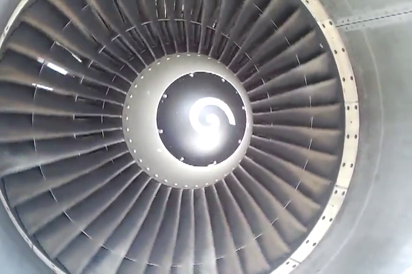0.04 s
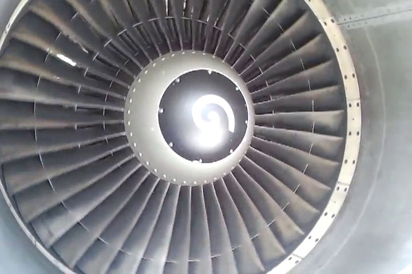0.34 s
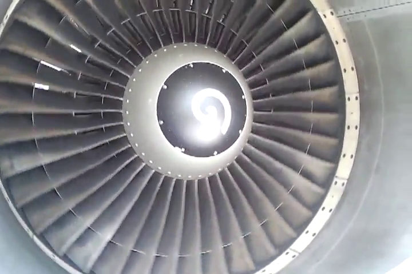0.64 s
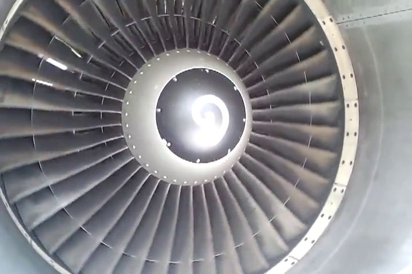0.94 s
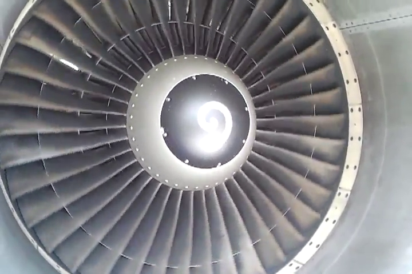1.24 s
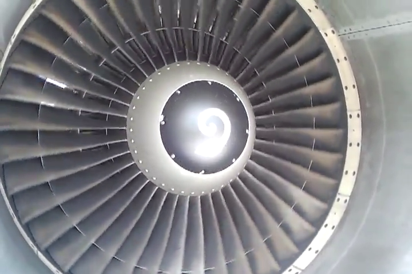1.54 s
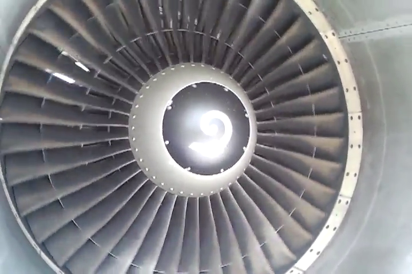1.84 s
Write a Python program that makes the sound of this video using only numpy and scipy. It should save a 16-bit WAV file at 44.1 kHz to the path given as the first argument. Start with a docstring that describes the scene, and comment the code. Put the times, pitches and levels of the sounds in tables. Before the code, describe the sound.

Loose blades of a slowly turning jet engine fan clack throughout, about seven sharp, briefly ringing metallic hits a second, slightly uneven and a little louder from 3 seconds. Two faint, thin squeaks come at about 1.3 and 1.7 seconds. Distant engines roar and whine softly behind. Low wind buffets on the microphone grow from around 2 seconds and are strongest between 3 and 4.

```python
"""Windmilling jet engine fan

The fan of a parked jet engine turns in the breeze. Each loose blade, passing over the top, tips in its
root slot and chatters to rest. The impacts excite the modes of blade, disc and inlet: about seven
metallic clacks a second, with two thin squeaks from the roots. Distant engines drone behind the fan,
and wind buffets the microphone more and more."""
import sys
import numpy as np
from scipy import signal
from scipy.fft import rfft, irfft
from scipy.io import wavfile

SR = 44100
rng = np.random.default_rng(int(sys.argv[2]) if len(sys.argv) > 2 else 0)


def output_pcm(signal):
    """Save a mono or channel-first signal as 16-bit PCM at the path in sys.argv[1].

    Samples are clipped to [-1, 1] before scaling.
    """
    pcm = np.clip(np.atleast_2d(signal).T, -1, 1) * 32767
    wavfile.write(sys.argv[1], SR, np.round(pcm).astype(np.int16))


N = 176400
TIME = np.arange(N) / SR
FREQ_HZ = np.fft.rfftfreq(N, 1 / SR)


def amp(db):
    """Amplitude ratio of a level in decibels."""
    return 10 ** (np.asarray(db) / 20)


def unit_rms(x):
    """Normalisation to an rms of one."""
    return x / np.sqrt(np.mean(x ** 2) + 1e-20)


def unit_energy(x):
    """Normalisation to an energy of one."""
    return x / (np.linalg.norm(x) + 1e-12)


def envelope(points):
    """Amplitude envelope interpolated between (time_s, level_db) points."""
    return amp(np.interp(TIME, *np.transpose(points)))


def spectrum_db(points, hz):
    """Spectral envelope: (frequency_hz, level_db) points interpolated in log frequency."""
    point_hz, db = np.transpose(points)
    return np.interp(np.log(hz + 1), np.log(point_hz), db)


def add(mix, start_s, sound):
    """Superposition of a sound on the mix."""
    part = mix[max(round(start_s * SR), 0):][:len(sound)]
    part += sound[:len(part)]


def noise(gain):
    """Spectral shaping of white noise by a gain at each of FREQ_HZ, to an rms of one."""
    return unit_rms(irfft(rfft(rng.standard_normal(N)) * gain, N))


def narrowband(hz, width_hz):
    """Noise confined to one resonance, heard as a wavering tone."""
    offset = (FREQ_HZ - hz) / width_hz
    return noise(1 / (1 + 2 * offset ** 2))


def drift(rate_hz):
    """Slow random modulation: low-pass noise."""
    return noise(np.exp(-(FREQ_HZ / rate_hz) ** 2))


def colour(x, gain_db, size=4096):
    """Minimum-phase filtering by gain_db, a function of frequency."""
    log_gain = np.log(amp(gain_db(abs(np.fft.fftfreq(size, 1 / SR)))))
    response = np.exp(np.conj(signal.hilbert(log_gain)))
    taps = np.fft.ifft(response).real[:size // 2]
    return signal.fftconvolve(x, taps)[:len(x)]


def fan(main_t60_s=0.086, pivot_hz=3600, size=12000):
    """Impact excitation: each clack is a contact force convolved with the metal's impulse response."""
    # Tips and rebounds of the blades; main_db is the main mode relative to the rest of the ring.
    # start_s, level_db, chatter_s, pitch_hz, main_db, tilt_db_per_octave
    clacks = [(0.05, -30, 0.035, 3700, -7, 0.5), (.139, -13.5, 0.02, 3720, -31, 2),
              (.171, -20.5, .02, 3650, -4, 0.5), (0.243, -17.5, 0.046, 3610, -4, -1),
              (0.365, -16, 0.015, 3460, -8, 0.5), (.499, -15.5, 0.03, 3550, -10, -1.5),
              (0.634, -15.5, 0.042, 3520, -2.5, -3), (0.78, -13, 0.022, 3505, -5, 0),
              (0.952, -31.5, 0.018, 3650, -8, -0.5), (1.036, -16.5, 0.014, 3616, -19, -1.5),
              (1.062, -22.5, 0.026, 3690, -7, -2.5), (1.158, -18, 0.015, 3580, -10, -0.5),
              (1.273, -17, 0.025, 3660, -5.5, -1.5), (1.412, -14, 0.009, 3580, -14.5, 3),
              (1.545, -15.5, 0.03, 3555, -6, -0.5), (1.811, -18.5, 0.058, 3630, 0.5, -1),
              (1.840, -22.5, 0.011, 3590, -2, 10), (1.934, -12.5, 0.031, 3660, -2.5, 1),
              (2.083, -15, 0.024, 3640, -1, -1), (2.213, -18, 0.023, 3710, -28, 0.5),
              (2.483, -22, 0.018, 3550, -19, -1.5), (2.601, -17, 0.049, 3520, -6, -1),
              (2.767, -27.5, 0.024, 3535, -7.5, -2.5), (2.882, -16.5, 0.028, 3590, -17, 0.5),
              (2.99, -13, 0.023, 3490, -11.5, 0.5), (3.133, -13, 0.032, 3633, -8, -0.5),
              (3.262, -11.5, 0.03, 3620, -16, 0.5), (3.400, -13.5, 0.027, 3570, -15, -1),
              (3.537, -13.5, 0.036, 3530, -3.5, -0.5), (3.661, -9, 0.027, 3430, -24, 2),
              (3.782, -13, .025, 3624, -5.5, 1.5), (3.923, -11.5, 0.015, 3650, -10, 2)]
    out, t = np.zeros(N), np.arange(size) / SR
    for start_s, level_db, chatter_s, pitch_hz, main_db, tilt in clacks:
        force = chatter(t, chatter_s)
        main_mode = amp(-60 * t / main_t60_s) * np.sin(2 * np.pi * pitch_hz * t)
        main = signal.fftconvolve(force, main_mode)[:size]
        rest = signal.fftconvolve(force, metal_ring(t))[:size]
        rest = colour(rest, lambda hz: tilt * np.log2(np.maximum(hz / pivot_hz, .5)))
        clack = unit_rms(rest) + amp(main_db) * unit_rms(main)
        onset_rms = clack[:1100].std()  # first 25 ms
        add(out, start_s, amp(level_db) * clack / onset_rms)
    return out


def chatter(t, length_s, median_gap_s=0.001, fade_db=-13.5, spread_db=3):
    """Inelastic rebound: the root strikes its slot, then bounces unevenly with weakening impulses."""
    gap, side, strength = rng.standard_normal((3, 200))
    times = median_gap_s * np.cumsum(np.exp(.7 * gap))
    impulses = np.sign(side) * amp(spread_db * strength + fade_db * (times / length_s) ** 3)
    force = np.bincount((times * SR).astype(int), impulses, len(t))[:len(t)]
    force[0] = 1.43  # firm first contact
    return force


def metal_ring(t, blade_t60_s=0.12, disc_t60_s=.1, tail_t60_s=0.23, blade_db=-11):
    """Modal superposition: distinct blade modes sound over the dense modes of disc and inlet."""
    # Modes common to the blades: frequency_hz, relative_db
    blade_modes = [(1840, -19), (2985, -11), (3272, -4), (4140, -8), (4381, -6), (4620, -9), (5165, -9),
                   (5839, -1), (6236, -4), (6430, -9), (6923, -4), (7970, -18), (9000, -25)]
    # Spectral envelope of disc and inlet: frequency_hz, relative_db
    disc_spectrum = [(200, -26), (550, -15.5), (1000, -15), (1650, -9.5), (1850, -1.5), (2500, -9),
                     (3050, 1), (3500, 8), (3900, 2), (4600, 3.5), (5100, -1.5), (6100, 4), (7050, 4),
                     (7500, -12), (8000, -11.5), (8500, -17), (9100, -12), (9600, -24.5), (10500, -47.5)]
    scatter, spread_db = 0.0061, 3.5  # variation from clack to clack
    modes = 0
    for hz, db in blade_modes:
        detune, strength, phase = rng.standard_normal(3)
        mode_hz = hz * (1 + scatter * detune)
        modes += amp(db + spread_db * strength) * np.sin(2 * np.pi * (mode_hz * t + phase))
    blade = unit_energy(modes * amp(-60 * t / blade_t60_s))
    # Overlapping modes behave as decaying noise.
    early, late = rng.standard_normal((2, len(t)))
    disc = unit_energy(early * amp(-60 * t / disc_t60_s))
    tail = amp(-10) * unit_energy(late * amp(-60 * t / tail_t60_s))
    tick = amp(-18) * (t == 0)
    dense = colour(disc + tail + tick, lambda hz: spectrum_db(disc_spectrum, hz))
    return amp(blade_db) * blade + unit_energy(dense)


def root_squeaks(length_s=0.033, width_hz=270):
    """Friction at the blade roots briefly excites high, narrow resonances."""
    # Rubs between the clacks: start_s, level_db, pitch_hz
    rubs = [(1.346, -32, 7200), (1.732, -35, 7600)]
    # Resonances of a rub: pitch_ratio, relative_db
    modes = [(1, -1), (1.12, -8), (1.24, -15)]
    out, swell = np.zeros(N), np.hanning(int(length_s * SR))
    for start_s, level_db, pitch_hz in rubs:
        tone = unit_rms(sum(amp(db) * narrowband(pitch_hz * ratio, width_hz) for ratio, db in modes))
        add(out, start_s, amp(level_db) * swell * tone[:len(swell)])
    return out


def distant_engines(waver_db=1.28, waver_hz=9):
    """Propagation through moving air modulates the amplitude of a broadband roar and narrowband whines."""
    # Spectral density of the roar: frequency_hz, relative_db
    roar_spectrum = [(50, -33), (120, -1.5), (320, -8.5), (480, -8), (720, -9.5), (1180, -7.5),
                     (1350, -8.5), (1620, -6.5), (1760, -2), (2000, -2.5), (2450, -3.5), (2600, -5.5),
                     (2900, -9.5), (3400, -9), (3700, -2.5), (4300, -3.5), (5300, -9.5), (7200, -10.5),
                     (8000, -22.5), (9000, -23.5), (10100, -57.5), (11000, -72)]
    # Envelope of the roar: time_s, level_db
    roar_levels = [(0, -32.5), (1, -32), (1.7, -33), (2.5, -35), (3.2, -33.5), (4, -35)]
    # Engine whines: frequency_hz, width_hz, relative_db
    whine_bands = [(1762, 12, -49), (1950, 45, -48), (2120, 10, -48), (2255, 35, -50), (2469, 12, -49),
                   (4240, 50, -53)]
    # Envelope common to the whines: time_s, gain_db
    whine_gains = [(0, 1.5), (1.1, 3.5), (1.8, -5), (2.5, 1.5), (3.2, -4), (4, -5)]
    whine = envelope(whine_gains) * sum(amp(db) * narrowband(hz, width) for hz, width, db in whine_bands)
    roar = envelope(roar_levels) * noise(amp(spectrum_db(roar_spectrum, FREQ_HZ)))
    return (roar + whine) * amp(waver_db * drift(waver_hz))


def breeze(lump_db=2, lump_hz=25):
    """Turbulent pressure fluctuations at the microphone make a lumpy, low rumble."""
    # Spectral density of the turbulence: frequency_hz, relative_db
    wind_spectrum = [(20, -28), (55, 3.5), (125, -13.5), (200, -7.5), (300, -19.5), (600, -19.5),
                     (1500, -45.5)]
    # Envelope of the rumble: time_s, level_db
    wind_levels = [(0, -45), (1, -53.5), (2, -42.5), (3, -40), (3.5, -46.5), (4, -40.5)]
    rumble = noise(amp(spectrum_db(wind_spectrum, FREQ_HZ)))
    lumps = amp(lump_db * drift(lump_hz))
    return envelope(wind_levels) * unit_rms(rumble * lumps)


def gusts(low_cut_hz=35, rolloff_order=3.33, size=16384):
    """Each eddy at the microphone is a low pressure pulse; faster eddies reach higher frequencies."""
    # Eddies under Gaussian envelopes: centre_s, level_db, half_width_s, upper_edge_hz
    eddies = [(0.149, -41, 0.048, 140), (1.382, -36, 0.046, 174), (1.916, -32, 0.01, 170),
              (2.144, -28, 0.021, 206), (2.304, -36, .02, 130), (2.585, -32, 0.032, 171),
              (2.845, -30, 0.021, 120), (2.958, -33, .018, 140), (3.118, -29, 0.029, 102),
              (3.204, -22.5, 0.02, 154), (3.284, -38, 0.089, 129), (3.38, -32.5, .025, 161),
              (3.577, -23, 0.0044, 550), (3.608, -28, 0.054, 150), (3.672, -29.5, 0.027, 132),
              (3.754, -25.5, 0.016, 170)]
    out = np.zeros(N)
    t = (np.arange(size) - size / 2) / SR
    hz = np.fft.rfftfreq(size, 1 / SR)
    for centre_s, level_db, half_width_s, edge_hz in eddies:
        band = hz / np.hypot(hz, low_cut_hz) / np.hypot(1, (hz / edge_hz) ** rolloff_order)
        buffet = irfft(rfft(rng.standard_normal(size)) * band)
        swell = np.exp(-.5 * (t / half_width_s) ** 2)
        thump = unit_energy(swell * buffet) * np.linalg.norm(swell)
        out += amp(level_db) * np.interp(TIME, centre_s + t, thump)
    return out


def scene():
    """Superposition of fan, distant engines and wind at one microphone."""
    return (fan() + root_squeaks() + distant_engines() + breeze() + gusts())[None]


def record(dry):
    """Soft saturation rounds the highest peaks; a low-pass filter then limits the bandwidth."""
    ceiling, cutoff_hz = .9, 10240
    rounded = dry / (1 + (dry / ceiling) ** 8) ** (1 / 8)
    low_pass = signal.firwin(301, cutoff_hz, window=("kaiser", 9), fs=SR)
    return signal.oaconvolve(rounded, low_pass[None], "same")


dry = scene()
out = record(dry)
output_pcm(out)
```